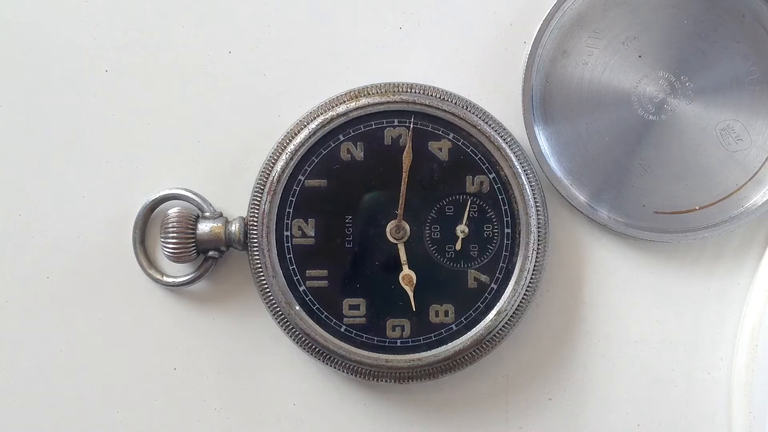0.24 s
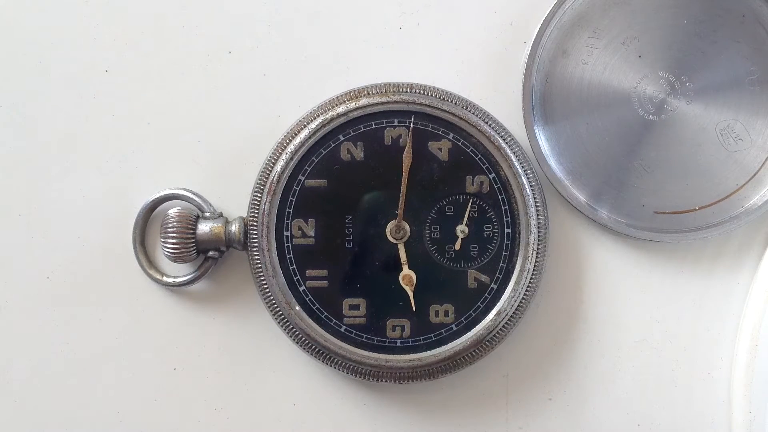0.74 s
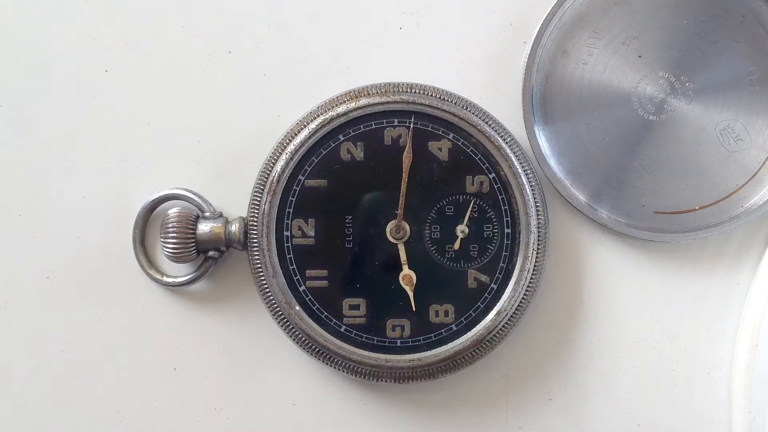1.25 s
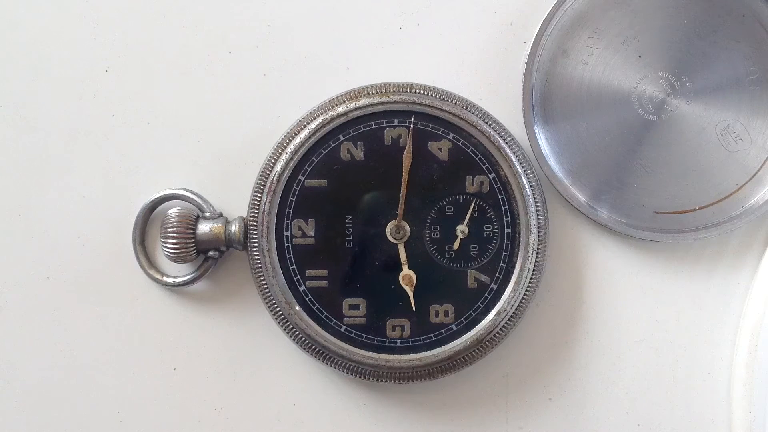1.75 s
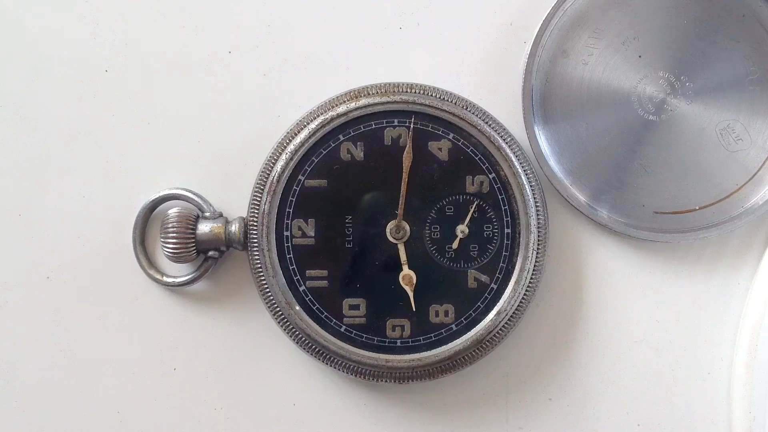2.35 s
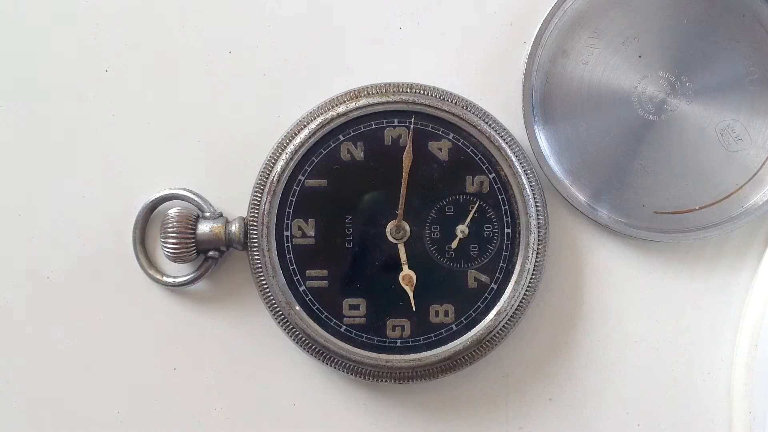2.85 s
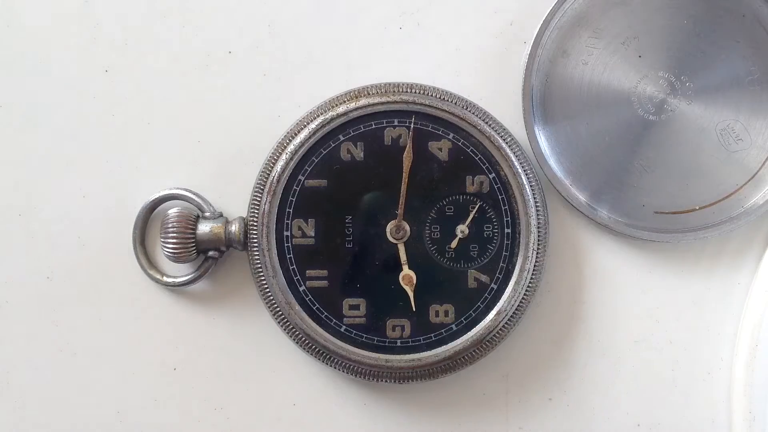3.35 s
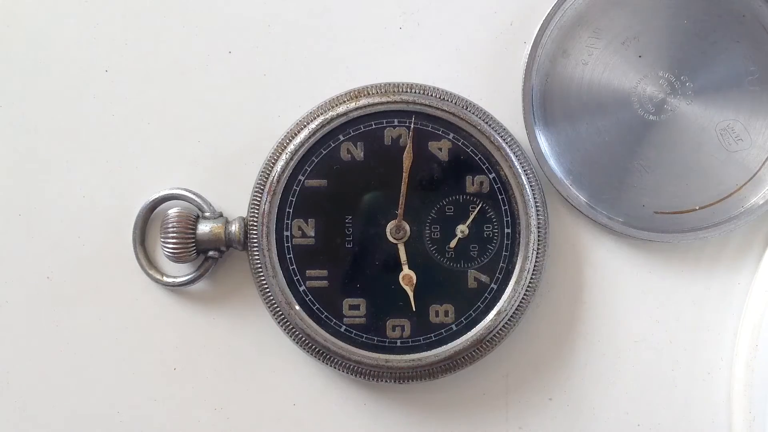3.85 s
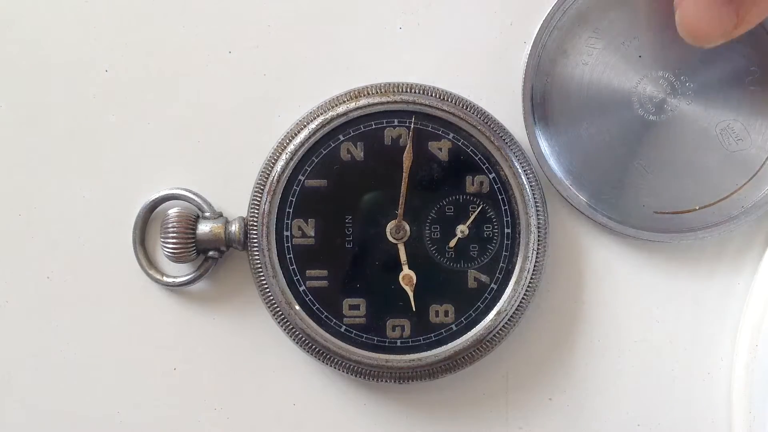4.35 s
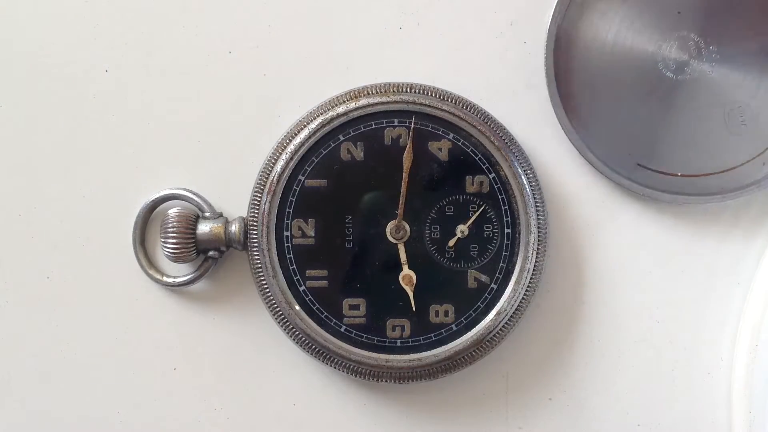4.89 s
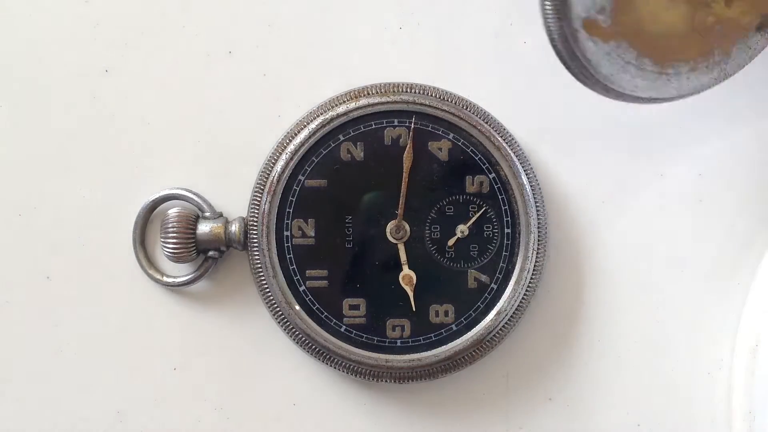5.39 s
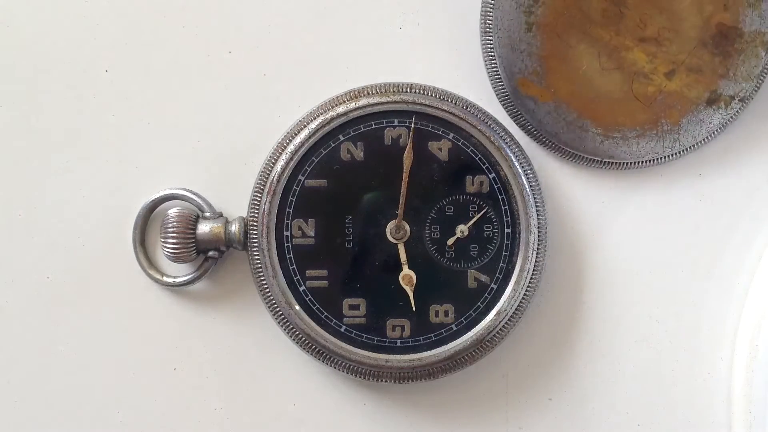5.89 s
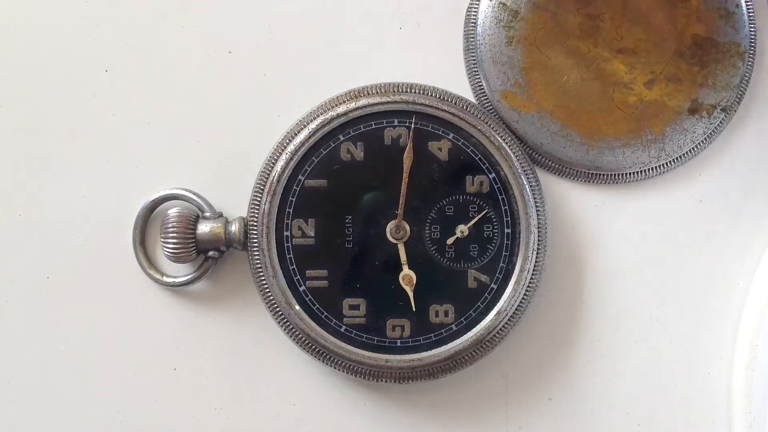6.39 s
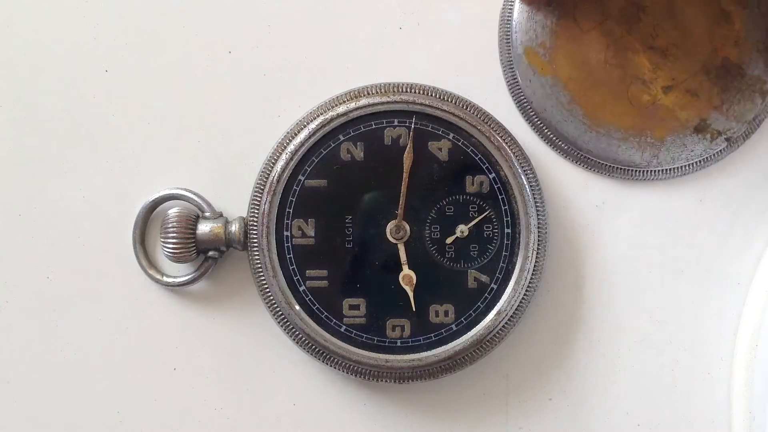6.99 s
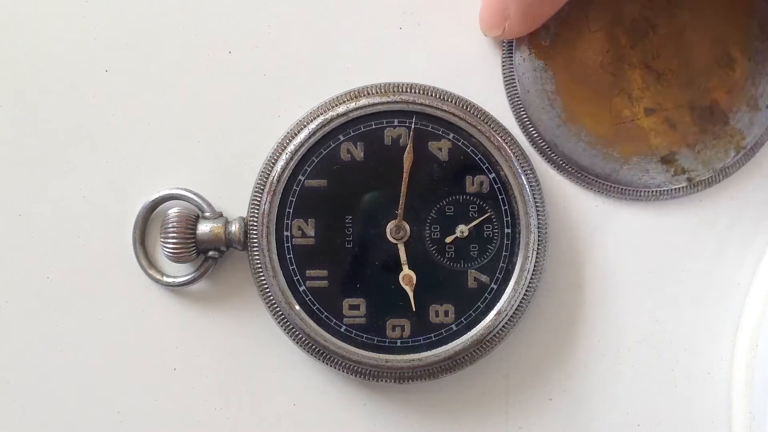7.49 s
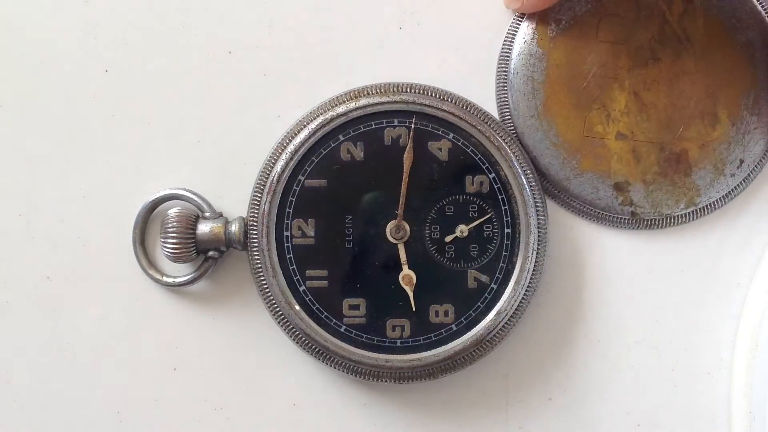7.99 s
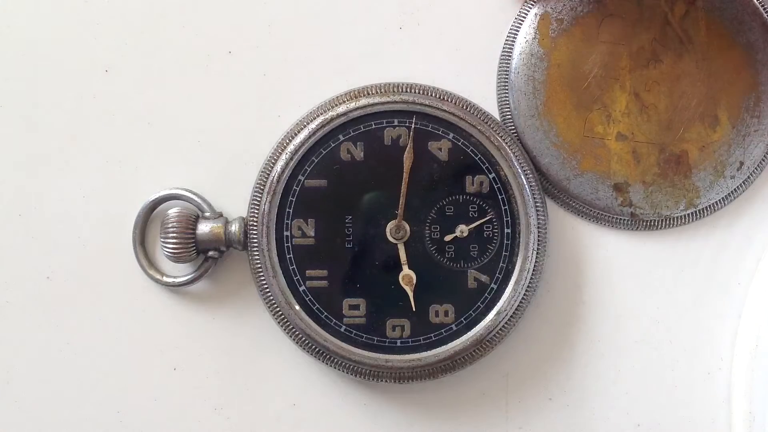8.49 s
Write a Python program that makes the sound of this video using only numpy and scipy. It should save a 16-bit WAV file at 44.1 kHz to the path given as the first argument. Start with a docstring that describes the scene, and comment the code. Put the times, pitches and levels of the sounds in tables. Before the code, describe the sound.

Crisp, high watch ticking runs over faint room hum, broken by a sharp metal clink and then a brighter clattering landing of a thin lid.

```python
"""A watch ticks five times a second over a faint room hum; now and then something chinks far off.
Then a hand slides the loose metal lid, turns it over, knocks it, lets it clatter down and nudges it about.
Watch and lid are fading sine waves set off by small blows, with noise for their snaps, cracks and rubs.
The chinks are narrow bands of noise that swell and die; the room is shaped noise with drifting levels.
The watch lies on a table close to a phone, which softens the peaks and cuts the highest treble."""
import sys
import numpy as np
from scipy import signal
from scipy.fft import rfft, irfft, next_fast_len
from scipy.io import wavfile
from scipy.ndimage import uniform_filter1d

SR = 44100
rng = np.random.default_rng(int(sys.argv[2]) if len(sys.argv) > 2 else 0)


def store_pcm(level_fs):
    """Save levels as 16-bit WAV."""
    pcm = np.round(np.clip(level_fs, -1, 1) * 32767).astype(np.int16)
    wavfile.write(sys.argv[1], SR, np.atleast_2d(pcm).T)


N = 385186  # length in samples

# Shape of the room noise. Each row: frequency in Hz, level per Hz in dB (only the differences count).
ROOM_SPECTRUM = [(12, -60.5), (20, -36.5), (38, -31.5), (59, -24), (169, 0.5), (206, 5.5), (287, -7),
                 (359, -6), (575, -13.5), (698, -13.5), (780, -16.5), (1060, -20.5), (2570, -35),
                 (13200, -45.5), (15200, -47)]
# How the room noise drifts. Each row: time in seconds, hum level in dB, middle rumble level in dB.
ROOM_LEVELS = [(0.0, -52, -61), (.7, -55.5, -59.5), (1.15, -50.5, -57.5), (1.7, -50.5, -59.5),
               (3.2, -53, -56), (4.42, -56.5, -52), (5.3, -54.5, -57), (5.9, -52.5, -60),
               (6.399, -56.5, -62.5), (7.401, -58, -58.5), (8.73, -53, -59)]
HISS_DB = -64.5
# Contacts inside one beat (unlocking, impulse, drop, lock, rebound), one table for each swing direction.
# Each row: time from the lock in milliseconds, level against the lock in dB.
TICK_CONTACTS = [(-22, -24), (-14.5, -30), (-12.8, -19), (-7.8, -24), (-3, -29), (0, 0), (1.2, -4),
                 (17, -25), (21, -27)]
TOCK_CONTACTS = [(-20.3, -15), (-11.5, -16), (-3, -30), (0, 0), (1.5, -10), (21, -28)]
# Ringing tones (modes) of the watch movement and case.
# Each row: frequency in Hz, level on a tick in dB, level on a tock in dB, time to fade by 60 dB in seconds.
WATCH_MODES = [(5480, -22, -14, .022), (5880, -23, -17, .022), (7550, -18, -11, .018),
               (7950, -13, -14, .018), (8700, -24, -16, .014), (9450, -18, -12, .013),
               (10250, -13, -7, .012), (10850, -7, -1, .012), (11550, -8, 0, .012), (12400, -8, -5, .01),
               (12950, -7, -1, .011), (13450, 1, -5, .012), (14300, -4, -6, .011), (14980, -13, -15, .012),
               (15800, -4, -12, .008)]
FIRST_BEAT_S, BEAT_S = .1145, .200228
TICK_DB, TOCK_DB, BEAT_SCATTER_DB = -38.3, -43.2, 1.0  # locking blow of each swing, and its chance spread
# Far chinks. Each row: start in seconds, frequency in Hz, level in dB, rise time constant in seconds,
# time to fade by 60 dB in seconds, spread of the band in Hz.
FAR_CHINKS = [(0.91, 2230, -62.5, 0.003, 0.6, 90), (0.84, 2200, -57, 0.0079, 0.46, 400),
              (1.13, 3250, -62, 0.015, 0.37, 60), (3.431, 1670, -51, 0.025, 1, 14),
              (3.42, 2250, -56.5, 0.014, 0.97, 750), (3.46, 3230, -61, .02, 0.94, 38),
              (3.46, 3430, -62, 0.024, 0.54, 38), (3.44, 5200, -63, 0.025, 1, 1100)]
# Frequencies of the lid's modes, in Hz.
LID_MODES_HZ = np.array([410, 840, 1200, 1430, 2125, 2500, 2900, 3425, 3516, 4450, 5031, 5480, 5786, 5831, 5979, 6410, 7240, 7970, 8771, 8817, 9057, 10565, 12420, 13000, 13776, 14196])
# The same modes in the same order. Each row: level in dB, time to fade by 60 dB in seconds when ringing freely.
LID_MODES = [(-7.5, 0.068), (-0.5, 0.029), (-5, 0.043), (0.5, 0.037), (-4, 0.037), (-2.5, 0.039),
             (-12, 0.046), (0.5, 0.076), (-11, 0.064), (-30, 0.01), (-10.5, 0.042), (-15.5, 0.033),
             (-10, 0.12), (-12, 0.15), (3.5, 0.088), (-20, .04), (-19.5, 0.05), (-17.5, 0.039), (0, 0.074),
             (-6.5, 0.14), (-11.5, 0.07), (-10, 0.11), (-4.5, 0.14), (-11.5, 0.055), (-5.5, 0.051),
             (-9, 0.16)]
# Modes of the lid lying face down under a finger. Each row: frequency in Hz, level in dB, time to fade by 60 dB
# in seconds when ringing freely.
PRESSED_LID_MODES = [(870, -2, 0.088), (1086, 8.5, 0.026), (1398, 4.5, 0.068), (1827, -5.5, 0.033),
                     (2410, -10, 0.027), (2735, -1, 0.035), (3140, 3, 0.067), (3726, 5, 0.036),
                     (4290, 0, 0.059), (5304, 2, 0.051), (6070, 1.5, 0.047), (6500, 0, 0.055),
                     (6780, -1.5, .05), (9000, -9.5, 0.076), (9200, -2.5, 0.045), (10320, -2, 0.052),
                     (12420, -11, 0.057), (14150, -7, 0.048)]
PRESSED_FROM_S = 6.6
# Lid sliding or rattling on the table. Each row: loudest moment in seconds, rise in seconds, fall in seconds,
# level in dB, tilt in dB per octave, dryness in dB (the ring drops by this, the rub gains half of it),
# average catches per second.
LID_SLIDES = [(4.692, 0.028, 0.068, -71, 9, 6, 1300), (4.757, 0.027, .03, -67, -8, 11.5, 1720),
              (5.018, .06, .045, -64.5, -8.5, -1, 1800), (5.158, 0.097, .07, -63.5, -0.5, 1, 900),
              (5.624, 0.037, 0.098, -55, -4, 9, 6500), (5.8, 0.19, 0.33, -61, -5, 10, 8500),
              (6.164, 0.078, 0.011, -58, -1, -5, 3500), (6.174, 0.0038, 0.016, -17.5, 0, 2, 2350),
              (6.223, 0.026, 0.049, -25.5, 3.5, 2, 3900), (6.9, .14, 0.083, -65.5, -1.5, -1.5, 1450),
              (7.0, 0.047, 0.07, -66.5, -1, -2.5, 1300), (7.129, .03, 0.03, -53.5, -2, -1.5, 900),
              (7.43, .012, 0.13, -61, -2, 1, 1000), (7.534, 0.019, 0.037, -53, -1.5, 1.5, 770),
              (7.576, 0.024, 0.028, -53.5, -1.5, -1, 1000), (7.7, 0.21, 0.24, -66.5, -1.5, -0.5, 1330),
              (7.9, .06, 0.15, -64, -0.5, 0.5, 1100)]
SLIDE_EDGE_DB = -19  # where a slide starts and ends, against its loudest
# Blows on the lid. Each row: start in seconds, ring level in dB, centre of the ring in octaves above 1 kHz,
# thud level in dB, ring length (1 is free, less is damped by fingers), extra gain of the crack in dB.
LID_BLOWS = [(4.683, -51.5, 3.5, -50, .33, 12.5), (4.708, -55, 3.3, -39, 0.72, 1),
             (4.756, -56, 3.3, -43, 0.96, 8), (4.964, -58, 3.2, -53, 0.77, 8),
             (4.992, -43, 3.6, -33, .4, 2), (5.012, -36, 3.35, -35, .35, 6),
             (5.094, -46, 1.8, -43, 0.38, -6), (5.156, -43, 1.95, -43.5, 0.95, -14),
             (5.188, -48.5, 2.2, -57, 0.73, -3), (5.569, -3, 1.66, -13.5, .5, 9.5),
             (5.612, -14, 1.49, -25.5, 0.5, 6.5), (5.746, -51.5, 1.6, -39, 0.78, 5),
             (5.793, -38.5, 1.77, -32, 0.63, -11), (5.904, -55.5, 2.05, -57, 0.36, 21),
             (5.988, -49.5, 1.97, -57, 0.72, 3), (6.17, -14.5, 1.66, -16, .5, 4),
             (6.174, -3, 2.6, -29.5, .9, -6), (6.177, -8.5, 2.2, -35, .5, -6),
             (6.188, -9.5, 2, -40, 0.82, -14), (6.203, -5.5, 2.23, -39, 0.8, -7),
             (6.214, -6.5, 2.32, -21.5, 0.82, 2), (6.215, -14.5, 3.8, -41.5, 1, -8.5),
             (6.222, -5, 2.4, -38, 0.37, -4), (6.232, -11, 2.2, -39, 0.36, -2),
             (6.241, -21.5, 2.6, -37, .55, 0), (6.255, -26, 1.9, -46, .55, 12),
             (6.889, -58.5, 3.9, -52, 0.59, -3.5), (6.926, -55, 4.1, -50, .7, 1.5),
             (7.001, -63, 2, -55, 0.49, -5), (7.116, -49, 1.9, -40, 0.45, -3.5),
             (7.129, -48, 1.37, -40, 0.97, -5), (7.426, -53.5, 1.2, -50.5, 0.72, -2),
             (7.53, -44, 2.2, -57, .47, -6), (7.567, -43, 1.2, -53, 0.65, 1), (7.576, -50, 1.8, -65, .6, 0),
             (7.735, -56, 1.2, -53, 0.64, -2.5), (7.871, -50, 1.25, -43.5, 0.57, 4),
             (7.933, -58.5, 1.44, -54, 0.57, -6.5), (8.309, -61, 1.7, -55, 0.65, -3)]
# How a blow weakens below and above its centre, and its thud above THUD_HZ (dB per octave)
BELOW_DB, ABOVE_DB, THUD_FALL_DB, THUD_HZ = 9.5, 17.5, 13.5, 874
TAIL_T60_S, TAIL_DB, TAIL_BEND_HZ = 0.31, -21.5, 4000  # room tail: fade, level, where its treble starts to drop
MIC_STEP_HZ, MIC_CUT_HZ = 15250, 16220


def undb(db):
    """Turns decibels into gain."""
    return 10 ** (np.asarray(db) / 20)


def unit(x):
    """Scales a sound to an average (rms) strength of 1."""
    return x / np.sqrt(np.mean(x ** 2))


def fade(t60, seconds):
    """Makes exponential fades, one row for each t60 (time to fall by 60 dB, in seconds)."""
    t = np.arange(int(seconds * SR)) / SR
    return np.exp(-np.log(1000) * t / np.reshape(t60, (-1, 1)))


def ring(hz, db, t60, seconds):
    """A struck object: each mode is a fading sine wave that starts upward or downward by chance."""
    phase = 2 * np.pi * np.outer(hz, np.arange(int(seconds * SR)) / SR)
    strengths = undb(db) * rng.choice([-1, 1], len(hz))
    return strengths @ (np.sin(phase) * fade(t60, seconds))


def colour(x, hz, db):
    """Filters a sound with a gain curve drawn through (Hz, dB) points, evenly spaced by octave."""
    size = next_fast_len(len(x) + 512)
    log_hz = np.log(np.arange(size // 2 + 1) * SR / size + 1)
    gain = undb(np.interp(log_hz, np.log(hz), db))
    return irfft(rfft(x, size) * gain, size)[:len(x)]


def add(out, s, x):
    """Mixes x into out from time s, in seconds."""
    start = int(s * SR)
    out[start:start + len(x)] += x[:max(N - start, 0)]


def walk(rate):
    """A wandering level: random values, rate per second, smoothed twice and scaled to a spread near 1."""
    hold = int(SR / rate)
    steps = np.repeat(rng.standard_normal(N // hold + 1), hold)
    return unit(uniform_filter1d(uniform_filter1d(steps, hold), hold)[:N])


def room_tone(flicker_db=1.0):
    """Noise in three overlapping ranges: hum and rumble drift apart and flicker over a steady hiss."""
    s, hum_db, rumble_db = np.transpose(ROOM_LEVELS)
    noise = colour(rng.standard_normal(N), *np.transpose(ROOM_SPECTRUM))
    out = 0
    f = np.geomspace(200, 3500, 25)
    levels = (hum_db, rumble_db, HISS_DB + 0 * s)
    for share, db, flicker in zip(np.eye(3), levels, (1, .5, 0)):
        # each range fades into its neighbour between 200, 700 and 3500 Hz
        gain = np.interp(np.log(f), np.log([200, 700, 3500]), share) + 1e-4
        zone = unit(colour(noise, f, 20 * np.log10(gain)))
        drift_db = np.interp(np.arange(N) / SR, s, db)
        out = out + zone * undb(drift_db + flicker * flicker_db * walk(4.0))
    return out


def watch(scatter_db=6.0, detune=0.0066, snap_db=-3):
    """Every contact of the lever rings the movement and gives a short snap; the two swings differ."""
    out = np.zeros(N)
    hz, tick_db, tock_db, t60 = np.transpose(WATCH_MODES)
    for beat, s in enumerate(np.arange(FIRST_BEAT_S, N / SR, BEAT_S)):
        if beat % 2:
            contacts, mode_db, lock_db = TOCK_CONTACTS, tock_db, TOCK_DB
        else:
            contacts, mode_db, lock_db = TICK_CONTACTS, tick_db, TICK_DB
        lock_db = lock_db + BEAT_SCATTER_DB * rng.standard_normal()
        for ms, against_lock_db in contacts:
            pitch_chance, level_chance = rng.standard_normal((2, len(hz)))
            # the same energy, shared anew among the modes
            struck_db = mode_db + scatter_db * level_chance
            excess = np.linalg.norm(undb(struck_db)) / np.linalg.norm(undb(mode_db))
            struck_db = struck_db - 20 * np.log10(excess)
            body = ring(hz * (1 + detune * pitch_chance), struck_db, t60, .03)
            burst = rng.standard_normal(len(body)) * fade(.012, .03)[0]
            snap = colour(burst, [2500, *hz], [-50, *mode_db + snap_db])
            add(out, s + ms / 1000, undb(lock_db + against_lock_db) * (body + snap))
    return out


def chinks():
    """Distant rings, blurred by the rooms between: narrow noise that swells and dies."""
    out = np.zeros(N)
    for s, hz, db, rise, t60, spread in FAR_CHINKS:
        band_hz = hz + spread * np.array([-3, -1, 0, 1, 3])
        blur = colour(rng.standard_normal(SR // 2), band_hz, [-40, -6, 0, -6, -40])
        shape = fade(t60, .5)[0] * (1 - fade(7 * rise, .5)[0])
        add(out, s, undb(db) * unit(blur) * shape)
    return out


def lid_modes(s):
    """Frequencies (Hz), levels (dB) and fade times (s) of the lid as it lies at time s."""
    if s > PRESSED_FROM_S:
        return np.transpose(PRESSED_LID_MODES)
    return (LID_MODES_HZ, *np.transpose(LID_MODES))


def lid_slides(spread_db=4.5, held=0.37, grip_db=5.0):
    """The rim catches and slips in uneven tiny knocks that ring the lid, with a dry rub around them."""
    out = np.zeros(N)
    longest = SR // 2  # samples
    for s, rise, fall, top_db, tilt, dry_db, grip_per_s in LID_SLIDES:
        t = np.arange(-rise, fall, 1 / SR)
        db = top_db + SLIDE_EDGE_DB * np.where(t < 0, -t / rise, t / fall)
        knock_db = spread_db * np.minimum(rng.exponential(size=longest), 4)
        sizes = undb(knock_db) * rng.choice([-1, 1], longest)
        caught = rng.random(longest) < grip_per_s / SR
        slips = unit(caught * sizes)[:len(t)]
        hz, mode_db, t60 = lid_modes(s)
        mode_db = mode_db + grip_db * rng.standard_normal(len(hz))  # each grip favours other modes
        for k in range(-2, 3):  # octaves around 4 kHz
            near = np.round(np.log2(hz / 4000)) == k
            push = slips * undb(db[:longest] + k * tilt)
            body = ring(hz[near], mode_db[near], held * t60[near], .15)
            ringing = signal.fftconvolve(push / undb(dry_db), body / np.linalg.norm(body))
            edges_hz = [2800 * 2. ** k, min(5600 * 2. ** k, 13500)]
            band = signal.butter(2, edges_hz, "band", fs=SR, output="sos")
            rub = signal.sosfilt(band, push * undb(dry_db / 2)) * 2 ** (1 - k / 2)
            add(out, s - rise, ringing)
            add(out, s - rise, rub)
    return out


def strength(hz, ring_db, centre, thud_db):
    """Strength of a blow at each frequency, in dB: a peak at the centre of its ring and a low thud."""
    off = np.log2(hz / 1000) - centre  # octaves from the centre
    ringing = undb(ring_db + np.where(off < 0, BELOW_DB * off, -ABOVE_DB * off))
    thud = undb(thud_db - THUD_FALL_DB * np.maximum(np.log2(hz / THUD_HZ), 0))
    return 20 * np.log10(np.hypot(ringing, thud))


def lid_blows(crack_t60=0.017, rise_s=0.0017, scatter_db=2.0):
    """Each blow rings the lid's modes as the place struck favours them, over a broad crack."""
    out = np.zeros(N)
    f = np.geomspace(100, 16000, 30)
    for s, ring_db, centre, thud_db, free, crack_db in LID_BLOWS:
        hz, mode_db, t60 = lid_modes(s)
        db = mode_db + strength(hz, ring_db, centre, thud_db)
        db = db + scatter_db * rng.standard_normal(len(db))
        body = ring(hz, db, t60 * np.clip(free, .1, 1), .3)
        burst = rng.standard_normal(len(body)) * fade(crack_t60, .3)[0]
        crack = colour(burst, f, strength(f, ring_db, centre, thud_db))
        # the ring builds up while the rim still presses on the table
        build_up = 1 - fade(rise_s, .3)[0]
        add(out, s, body * build_up + undb(crack_db) * crack)
    return out


def room_tail(near):
    """Echoes of the near sounds: a fading burst of noise, duller in the treble, 4 ms behind them."""
    burst = rng.standard_normal(SR // 2) * fade(TAIL_T60_S, .5)[0]
    tail = colour(burst, [300, 1500, TAIL_BEND_HZ, 15000], [-4.5, 1.0, -1, -10.5])
    tail = np.concatenate([np.zeros(int(.004 * SR)), tail / np.linalg.norm(tail)])
    return undb(TAIL_DB) * signal.fftconvolve(near, tail)[:N]


def scene():
    """Near sounds with their bass cut off, with a dull room tail, over chinks and room tone."""
    no_bass = signal.butter(4, 300, "high", fs=SR, output="sos")
    near = signal.sosfilt(no_bass, watch() + lid_slides() + lid_blows())
    return (near + room_tail(near) + chinks() + room_tone())[None]


def record(dry):
    """The phone rounds the loudest peaks, steps down at the top of its range and cuts above it."""
    step = signal.ellip(6, .3, 26, MIC_STEP_HZ, fs=SR, output="sos")
    cut = signal.ellip(10, .2, 80, MIC_CUT_HZ, fs=SR, output="sos")
    rounded = 0.86 * 1.41 * np.tanh(dry / 1.393)
    return signal.sosfilt(cut, signal.sosfilt(step, rounded))


dry = scene()
out = record(dry)
store_pcm(out)
```